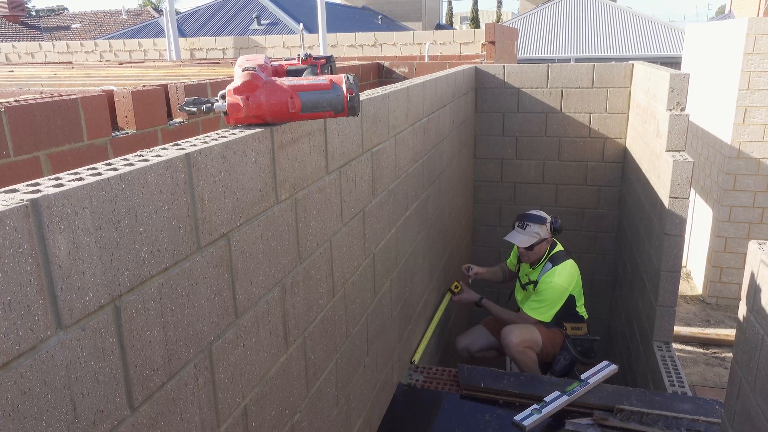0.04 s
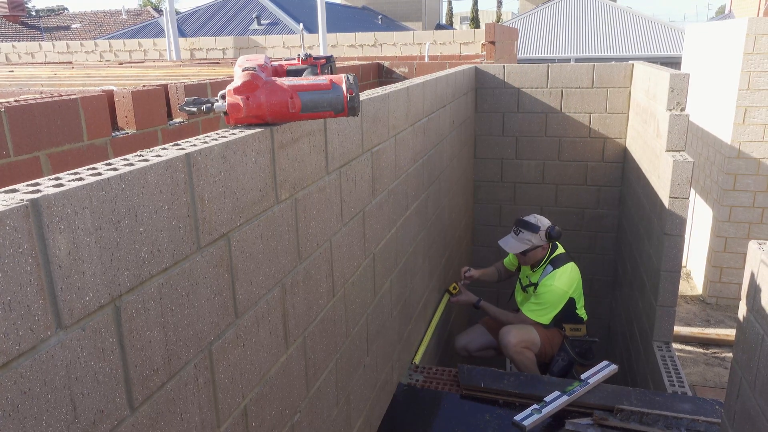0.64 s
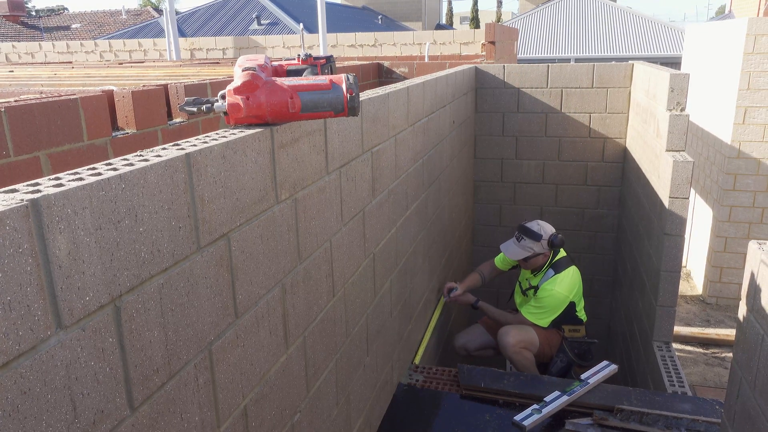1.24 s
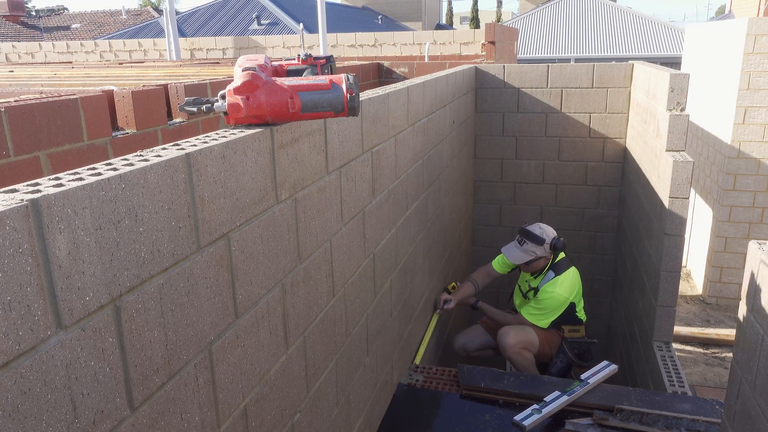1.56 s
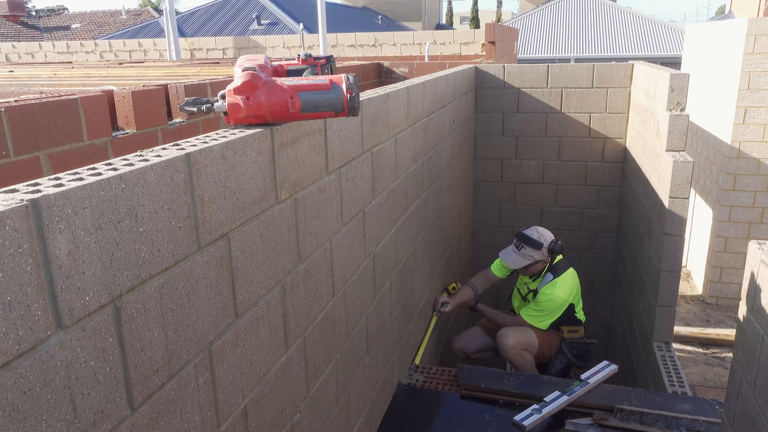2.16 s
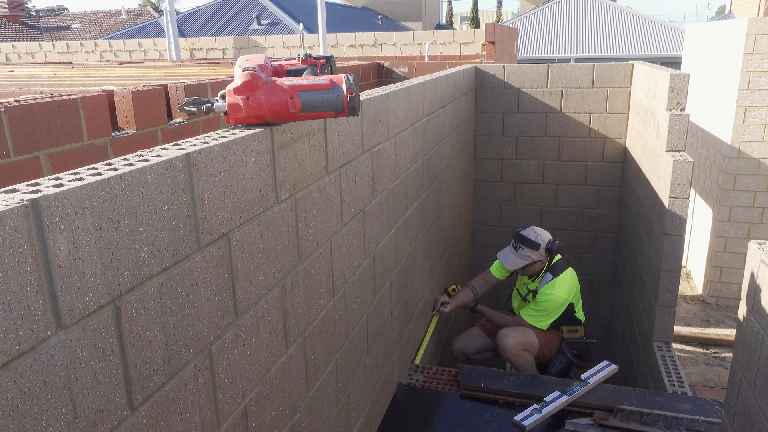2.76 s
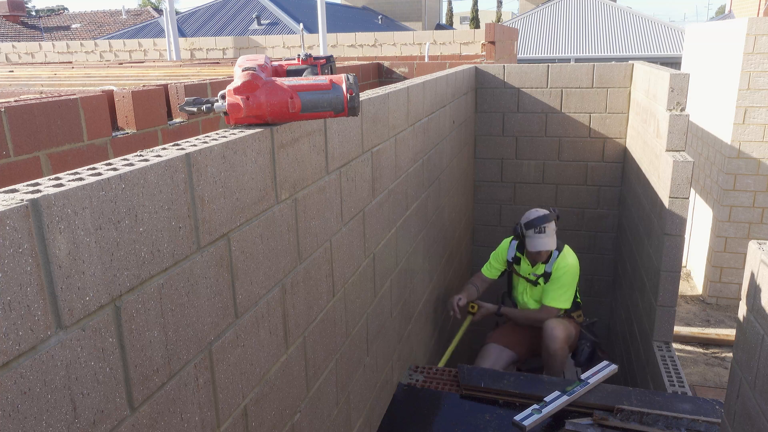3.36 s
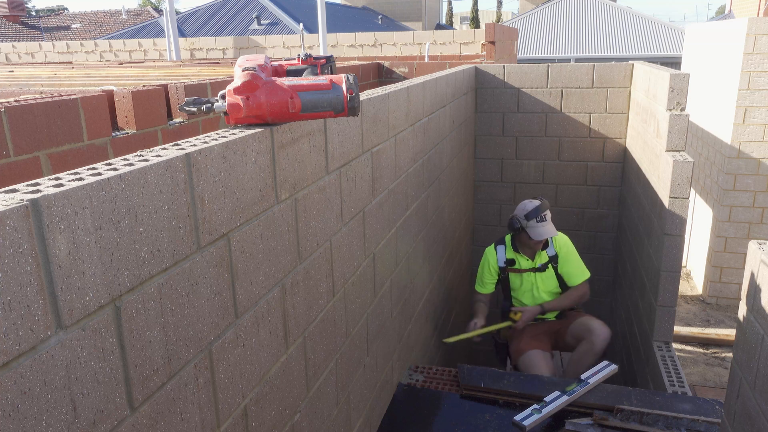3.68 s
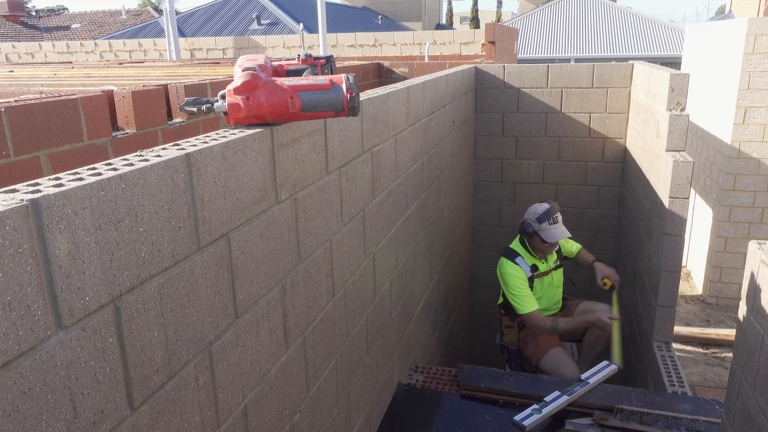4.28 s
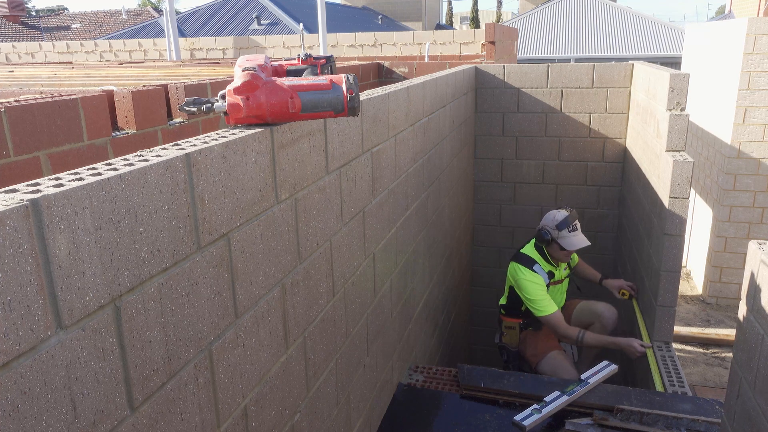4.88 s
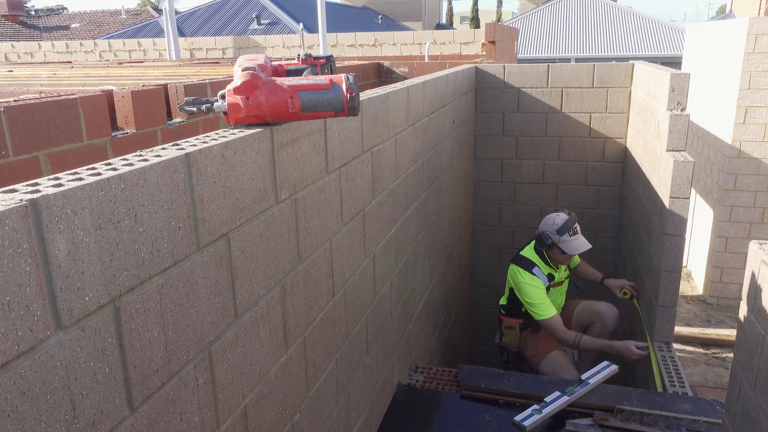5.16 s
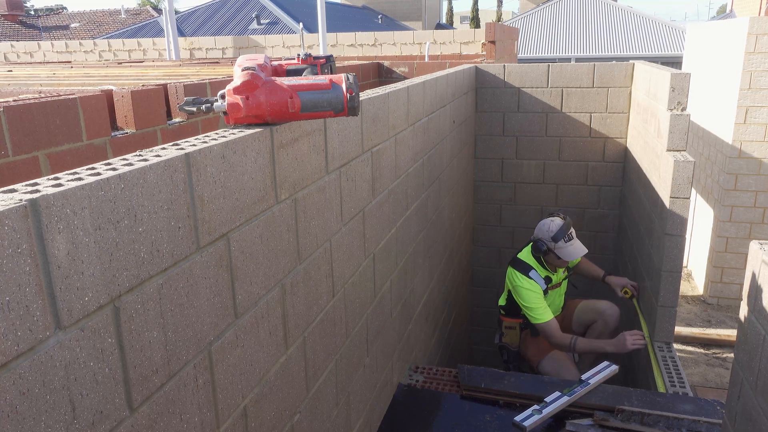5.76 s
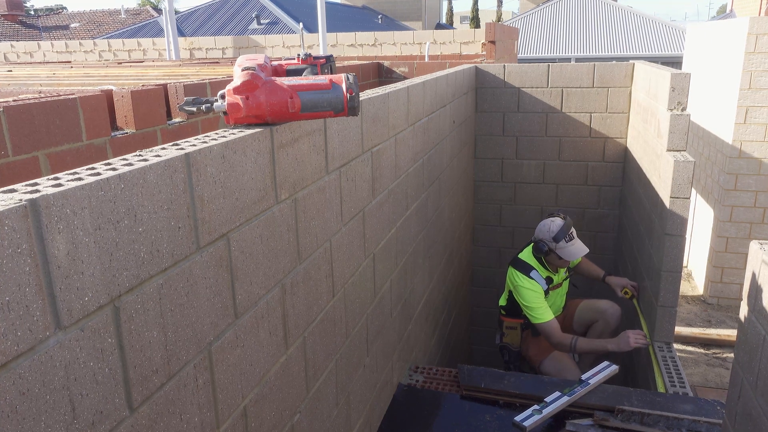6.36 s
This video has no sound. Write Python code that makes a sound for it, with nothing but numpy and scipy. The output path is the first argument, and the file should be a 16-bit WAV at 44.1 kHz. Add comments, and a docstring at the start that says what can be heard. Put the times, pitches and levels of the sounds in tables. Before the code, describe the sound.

A steel tape measure clicks against masonry in a quick cluster during the first half second, with faint clothing rustle. After a quiet gap, sharp taps and a short scrape come at about 1.6 seconds, and more between 2.4 and 2.8. From around 3 seconds the sound grows busier as a crouching worker turns round: clothes rustle and swish, grit crunches, and boots and knees land with soft low thumps until about 4.2. Meanwhile the long blade buckles with hollow, wavering knocks until 4.8, mixed with bright clicks, scrapes and brief high zings near 3.4 and 4.5. The rustling settles by 5 seconds. The tape taps and scrapes again around 5.1, then in a tight cluster near 5.7, with another click at 6.2 and a lighter one at 6.5. The close block walls add a short, dense echo throughout.

```python
"""A narrow bay between block walls: a crouching worker handles a steel tape measure.
Hook and case click and scrape on the masonry, ringing the thin steel; the sliding blade sings briefly.
He turns round with rustling clothes and gritty boots, the long blade buckles with hollow knocks,
and he sets it down at the other wall. The close walls add a short, dense echo."""
import sys
import numpy as np
from scipy import signal
from scipy.io import wavfile
from scipy.ndimage import uniform_filter1d

SR = 44100
rng = np.random.default_rng(int(sys.argv[2]) if len(sys.argv) > 2 else 0)


def pcm_store(signal):
    """Save signal as 16-bit PCM."""
    levels = np.round(np.clip(np.atleast_2d(signal), -1, 1) * 32767)
    wavfile.write(sys.argv[1], SR, levels.astype(np.int16).T)


N = 287532
FREQS = np.fft.rfftfreq(8192, 1 / SR) + 1  # filter grid [Hz]
# Dull response of the wall: (frequency [Hz], level [dB])
THUD_SPECTRUM = [(25, -31), (50, -19.5), (90, -1.5), (160, -0.5), (240, -4.5), (450, -5), (850, -5.5),
                 (1400, -7.5), (2500, -7.5), (6000, -52)]
# Grit crushed at a contact: (frequency [Hz], level [dB])
SNAP_SPECTRUM = [(2500, -30.5), (5500, -2.5), (6500, -1.5), (8700, -6), (11000, -11), (13500, -14),
                 (16000, -20.5)]


def clicks(chatter=0.32, rise_s=0.0006, chatter_t60_s=0.015, rattle_t60_s=0.12, thud_t60_s=0.12,
           rattle_db=-16, thud_db=-15.5, spring_db=-46, level_db=-5):
    """Hook and case tap the wall: a bright chattering blow, a duller case rattle, a thud, a faint coil."""
    # (time [s], level [dB], ring centre [Hz], relative snap [dB])
    taps = [(0.0253, -23, 2710, -11), (0.0792, -8, 2440, -5), (0.0885, -13.5, 2380, -10),
            (0.1077, -11, 2710, -6.5), (0.141, -11, 2540, -7.5), (0.2039, -31.5, 2500, 3.5),
            (0.3443, -38, 2480, -14), (0.4368, -12.5, 2350, -9), (0.4404, -15.5, 2760, 13),
            (0.6998, -41.5, 6500, 9), (1.5467, -32.5, 4230, -21.5), (1.629, -13.5, 4170, -18),
            (1.6423, -5, 3260, -16), (1.657, -7.5, 2340, -26.5), (1.7048, -18.5, 2410, -26),
            (2.387, -28.5, 2470, -27), (2.5038, -8, 2810, -14), (2.5908, -19, 3030, -11.5),
            (2.744, -17.5, 2500, -22), (3.0677, -9.5, 3010, -21.5), (3.0776, -11, 5250, -19),
            (3.0835, -2, 5100, -15.5), (3.1074, -12.5, 2230, -5.5), (3.1166, -6, 4800, -13.5),
            (3.4109, -5, 5060, -6), (3.4856, -7.5, 3080, -11), (3.91, -4, 3600, -23),
            (4.0323, -7.5, 4400, -26), (4.0846, -8.5, 2100, -8.5), (4.3188, -11, 2500, 15),
            (4.3598, -7, 4460, -18), (4.733, -6, 3760, -4.5), (4.8394, -12.5, 2350, -27),
            (4.9768, -23.5, 2460, -11), (5.0898, -32, 4730, -24), (5.1226, -5, 5140, -25),
            (5.1996, -11, 4200, -12), (5.2164, -10, 4530, -19.5), (5.4175, -32, 3580, 0),
            (5.658, -7, 4960, -13), (5.6738, -19, 3960, -14), (5.713, -10, 3730, -8),
            (5.7283, -5.5, 3720, -5), (5.7609, -9, 3800, -2), (6.1549, -5.5, 3730, 1),
            (6.3078, -21.5, 5770, 7), (6.4932, -17.5, 3330, 3)]
    # Coil in the case: (frequency [Hz], level [dB], t60 [s])
    spring_modes = [(2080, 0, 0.34), (2650, -3.5, .35), (3268, -3.5, 0.65)]
    out, t = np.zeros(N), np.arange(SR // 2) / SR
    for start_s, db, hz, snap_db in taps:
        noise = rng.standard_normal((3, len(t)))
        drive = chatter * noise[0] * np.minimum(t / rise_s, 1) * decay(t, chatter_t60_s)
        drive[int(rise_s * SR)] += 1
        blow = unit_burst(steel(drive, hz, snap_db, ripple_db=3), size=88)
        rattle = steel(noise[1] * decay(t, rattle_t60_s), 0.81 * hz, snap_db=-18, ripple_db=6.5)
        thud = coloured(noise[2] * decay(t, thud_t60_s), curve_at(THUD_SPECTRUM, FREQS))
        glance_db = -5 * np.log2(hz / 2780)  # glancing taps ring higher, shake the wall less
        tap = blow + gain_of(rattle_db) * unit_burst(rattle, size=400)
        tap += gain_of(thud_db + glance_db) * unit_burst(thud, size=400)
        tap += gain_of(spring_db) * ring(spring_modes, t)
        add(out, start_s, gain_of(db + level_db) * tap)
    return out


def steel(drive, centre_hz, snap_db=-20, ripple_db=2.5):
    """Hook and case filter a contact: a hump set by its hardness, case resonances and a bright snap."""
    # (frequency [multiple of centre], level [dB])
    hump = [(.1, -34.5), (.3, -26.5), (.55, -1.5), (1, 5), (1.45, -3), (2.2, -11), (3.2, -19.5), (8, -49.5)]
    # (frequency [Hz], lift [dB], width [Hz])
    case_modes = [(2400, 1, 270), (2840, 3, 750), (3570, 5.5, 440), (4460, 7, 500), (5380, 6, 580),
                  (7500, -8.5, 200), (9300, 1, 900)]
    lifts_db = sum(db / (1 + (2 * (FREQS - hz) / width_hz) ** 2) for hz, db, width_hz in case_modes)
    body = unit_rms(gain_of(curve_at(hump, FREQS / centre_hz) + lifts_db))
    snap = gain_of(snap_db) * unit_rms(gain_of(curve_at(SNAP_SPECTRUM, FREQS)))
    contact_db = ripple_db * smooth_noise(len(FREQS), 26, 14)  # each contact point favours its own modes
    return coloured(drive, 10 * np.log10(body ** 2 + snap ** 2) + contact_db)


def buckles(flap=0.06, flaps_per_s=1300, crinkle_db=-7, crinkle_hz=1600, wobble=0.025,
            rise_s=0.0069, level_db=-1):
    """The curved blade snaps through and flaps; its bending modes waver as the curve changes."""
    # (time [s], level [dB], tilt [dB/octave], flapping t60 [s], mode frequency factor)
    knocks = [(2.951, -25.5, -6.5, .05, 1.22), (3.222, -18, -4, 0.14, 0.7), (3.333, -14, 16.5, 0.1, 0.95),
              (3.735, -11.5, 6.5, .31, 1.04), (3.985, -11.5, 5, 0.21, 1.07), (4.1, -12, 20.5, .33, 1.16),
              (4.145, -19, 7, .3, 0.94), (4.226, -12, -4, .22, .99), (4.262, -25, -23, 0.096, 0.89),
              (4.498, -8.5, 0, 0.21, 1.0), (4.62, -23.5, -6.5, 0.17, 0.79), (4.758, -8.5, 1, 0.17, 1.0)]
    # (frequency [Hz], level [dB], t60 [s])
    blade_modes = [(777, -2, 0.22), (803, -1, 0.1), (936, -15, 0.076), (1067, -1.5, 0.15),
                   (1246, 2.5, 0.02), (1430, -25.5, .07), (1460, -23, .09), (1740, -9.5, 0.22),
                   (1823, 1, 0.04), (1990, -5, 0.022), (2010, -16.5, 0.23), (3270, -19, 0.024)]
    out, t = np.zeros(N), np.arange(SR // 2) / SR
    for start_s, db, tilt_db, t60_s, tuning in knocks:
        flapping = grains(len(t), flaps_per_s, spread_db=4.8) * decay(t, t60_s)
        drive = flap * flapping
        drive[0] += 1
        bend = signal.fftconvolve(drive, ring(blade_modes, t, tilt_db, tuning))[:len(t)]
        warped_s = t + np.cumsum(wobble * smooth_noise(len(t), 500)) / SR
        bend = unit_burst(np.interp(warped_s, t, bend), size=600)
        crinkle = unit_burst(steel(flapping, crinkle_hz * tuning), size=600)
        knock = np.minimum(t / rise_s, 1) * (bend + gain_of(crinkle_db) * crinkle)
        add(out, start_s, gain_of(db + level_db) * knock)
    return out


def scrapes(slips_per_s=9000, rise_share=0.097, hold_share=0.53, release_t60_s=0.083):
    """Blade or boot slides on masonry: a burst of slips with a steely edge over a dull rub."""
    # (time [s], level [dB], length [s], centre [Hz], relative snap [dB])
    slides = [(0.14, -23.5, 0.0052, 2540, -23.5), (0.424, -33, 0.053, 2410, -6.5),
              (1.65, -17, 0.021, 2720, -30.5), (1.8, -30.5, .02, 2100, -18),
              (2.501, -14.5, 0.043, 1910, -13.5), (2.737, -34, 0.019, 2740, -9),
              (2.816, -42.5, 0.045, 3200, -12), (2.897, -49, 0.018, 3860, -22),
              (2.971, -26, 0.094, 3250, -28), (3.087, -16, 0.096, 3270, -30), (3.328, -18, 0.15, 2600, -20),
              (3.443, -18.5, 0.018, 5000, -26), (3.948, -13.5, .11, 1800, -30),
              (4.079, -14, 0.21, 1740, -22.5), (4.458, -15.5, 0.078, 4070, -27),
              (5.121, -25, 0.01, 4300, -13.5), (5.189, -21, 0.096, 4160, -31),
              (5.349, -39, 0.084, 3870, -7), (5.619, -32.5, 0.038, 5600, -6),
              (5.652, -18.5, 0.1, 4200, -15), (5.711, -15, 0.049, 3740, -14),
              (5.754, -24, 0.085, 4440, -16), (6.053, -41, 0.029, 4280, -13), (6.157, -19, 0.03, 3900, -16),
              (6.302, -32, 0.02, 5820, -4), (6.488, -22, 0.078, 4500, -9)]
    out, t = np.zeros(N), np.arange(SR // 3) / SR
    for start_s, db, length_s, hz, snap_db in slides:
        attack = np.minimum(t / (rise_share * length_s), 1)
        stroke = attack * decay(np.maximum(t - hold_share * length_s, 0), release_t60_s)
        edge = steel(stroke * grains(len(t), slips_per_s, spread_db=2.5), hz, snap_db)
        rub = coloured(stroke * rng.standard_normal(len(t)), curve_at(THUD_SPECTRUM, FREQS))
        rub_db = -24.5 - 0.52 * db  # light strokes are duller
        scrape = unit_burst(edge, size=500) + gain_of(rub_db) * unit_burst(rub, size=500)
        add(out, start_s, gain_of(db) * scrape)
    return out


def zings(slips_per_s=72):
    """Stick-slip at the sliding edge briefly pumps one high mode of the blade."""
    # (time [s], length [s], start [Hz], end [Hz], width [Hz], level [dB])
    glides = [(3.415, 0.013, 5470, 5300, 100, -16.5), (3.441, .03, 7400, 7640, 250, -19.5),
              (3.64, 0.077, 9000, 8520, 1486, -26.5), (4.451, 0.061, 7240, 7250, 600, -24),
              (5.654, .079, 9600, 9500, 450, -28), (5.762, .016, 9750, 9300, 450, -31)]
    out = np.zeros(N)
    for start_s, length_s, start_hz, end_hz, width_hz, db in glides:
        t = np.arange(0, length_s, 1 / SR)
        stutter = 1 + 0.5 * np.sin(2 * np.pi * slips_per_s * t)
        mode = narrow_noise(t, np.linspace(start_hz, end_hz, len(t)), width_hz)
        add(out, start_s, gain_of(db) * stutter * mode * signal.windows.tukey(len(t), 0.3))
    return out


def rustle(cloth_db=-2, swish_db=-4, grit_db=-2.5, crackle_db=-13.5, clump_db=1):
    """Heavy cloth rumbles, sleeves swish, sand crunches and cracks; all catch and slip in clumps."""
    # Each: (frequency [Hz], level [dB])
    cloth_spectrum = [(25, -44.5), (50, -25), (85, -7), (130, 0), (200, -3.5), (290, 1), (420, -0.5),
                      (620, 1.5), (900, -2), (2000, -39.5)]
    swish_spectrum = [(300, -30), (600, -6), (780, -3.5), (1300, 1.5), (2100, 1), (2700, -2), (5000, -32.5)]
    grit_spectrum = [(1200, -39), (2200, -6.5), (2800, -0.5), (4500, -2.5), (6000, -7), (8000, -10),
                     (11000, -16.5), (16000, -33.5)]
    clumps = gain_of(clump_db * smooth_noise(N, 600, 300))
    cloth = unit_rms(coloured(rng.standard_normal(N), curve_at(cloth_spectrum, FREQS)))
    folds = grains(N, per_s=6000, spread_db=1.5)
    swish = shifting_resonances(coloured(folds, curve_at(swish_spectrum, FREQS)), depth_db=2)
    sand = grains(N, per_s=9000, spread_db=3)
    crunch = shifting_resonances(coloured(sand, curve_at(grit_spectrum, FREQS)), depth_db=3)
    cracks = grains(N, per_s=64, spread_db=4.5)
    crackle = unit_rms(coloured(cracks, curve_at(SNAP_SPECTRUM, FREQS)))
    grit = crunch + gain_of(crackle_db) * crackle
    layers = [gain_of(cloth_db) * cloth, gain_of(swish_db) * swish, gain_of(grit_db) * grit]
    return clumps * (movement() * layers).sum(0)


def movement(rise_s=0.0082, settle_db_per_s=255.5, turn_fade_s=0.05, sliding_share=0.38):
    """Envelopes of cloth, swish and grit: small shifts of the crouching body and one long turn."""
    # (time [s], hold [s], effort [dB])
    body_shifts = [(0.0, 0.013, -30.5), (0.108, 0.023, -31.5), (0.333, 0.021, -57.5), (0.414, .02, -46),
                   (0.689, 0.013, -52.5), (0.87, 0.086, -55.5), (0.969, 0.094, -55.5),
                   (1.426, 0.011, -51.5), (1.48, 0.042, -68), (1.538, .02, -47), (1.581, 0.064, -42.5),
                   (1.64, 0.068, -34), (1.79, 0.014, -36), (1.86, 0.11, -61.5), (2.376, 0.013, -48),
                   (2.49, 0.022, -43.5), (2.57, 0.038, -46), (2.66, .05, -59), (2.73, 0.042, -53),
                   (2.82, 0.038, -50.5), (2.946, 0.11, -32), (5.199, 0.058, -36.5), (5.3, 0.11, -49.5),
                   (5.533, 0.016, -52.5), (5.67, 0.15, -35.5), (5.84, 0.12, -40), (6.001, 0.14, -49),
                   (6.148, 0.031, -26.5), (6.3, 0.057, -49), (6.483, .035, -37.5)]
    # (time [s], effort [dB], sliding grit [dB])
    turn = [(3.16, -29, -50), (3.196, -39, -33), (3.234, -19.5, -31.5), (3.418, -33.5, -27.5),
            (3.678, -21, -25), (3.904, -27.5, -28), (4.272, -22, -31.5), (4.424, -31.5, -30),
            (4.482, -23.5, -28.5), (4.592, -27.5, -41), (4.764, -21, -40), (4.872, -34, -57),
            (5.1, -48, -63.5)]
    t, shifts = np.arange(N) / SR, np.zeros(N)
    for start_s, hold_s, db in body_shifts:
        settled_db = settle_db_per_s * np.maximum(t - start_s - hold_s, 0)
        shifts += np.clip((t - start_s) / rise_s, 0, 1) * gain_of(db - settled_db)
    times_s, *curves_db = np.transpose(turn)
    turning = np.clip(np.minimum(t - times_s[0], times_s[-1] - t) / turn_fade_s + 1, 0, 1)
    effort_db, sliding_db = (np.interp(t, times_s, curve) for curve in curves_db)
    sleeves_db = effort_db + sliding_share * (sliding_db - effort_db)
    cloth = gain_of(1.5) * shifts + turning * gain_of(effort_db + 0.5)
    swish = gain_of(1) * shifts + turning * gain_of(sleeves_db + 6.5)
    grit = gain_of(-4.5) * shifts + turning * gain_of(sliding_db + 9)
    return np.array([cloth, swish, grit])


def shifting_resonances(x, depth_db):
    """Folds and contacts change shape, so their resonances come and go."""
    spectra = signal.stft(x, nperseg=512, noverlap=384)[2]
    patches = uniform_filter1d(rng.standard_normal(spectra.shape), size=4, axis=0)
    patches = unit_rms(uniform_filter1d(patches, size=12, axis=1))
    return unit_rms(signal.istft(spectra * gain_of(depth_db * patches), nperseg=512, noverlap=384)[1][:N])


def steps(rise_s=0.031, scuff=0.06):
    """Weight comes down softly on boots and knees and booms in the bay."""
    # (time [s], level [dB], frequency [Hz], t60 [s])
    footfalls = [(1.679, -32, 186, .14), (3.227, -29, 167, 0.045), (3.292, -26, 342.4, .12),
                 (3.641, -24, 270.5, 0.42), (3.691, -28, 165, 0.27), (3.757, -21.5, 311, 0.14),
                 (3.981, -21, 141, .14), (4.192, -29.5, 118.5, .22), (4.225, -23.5, 285, 0.043)]
    out, t = np.zeros(N), np.arange(SR // 2) / SR
    for start_s, db, hz, t60_s in footfalls:
        tone = np.sin(2 * np.pi * hz * t) + scuff * narrow_noise(t, hz, hz / 2)
        boom = tone * np.minimum(t / rise_s, 1) * decay(t, t60_s)
        add(out, start_s, gain_of(db) * unit_burst(boom, size=800))
    return out


def bay_echo(x, build_s=0.014):
    """Dense reflections between close block walls; the bass lingers longest."""
    # (frequency [Hz], t60 [s])
    decay_times = [(100, 0.33), (260, 0.24), (700, 0.3), (1840, 0.087), (4850, 0.29), (14000, 0.13)]
    # (frequency [Hz], level [dB])
    echo_spectrum = [(100, 4.5), (700, -4), (1500, -0.5), (3000, -8), (6000, -16.5), (14000, -19.5)]
    hz, t, spectra = signal.stft(rng.standard_normal(SR), SR, nperseg=256)
    t60_s = curve_at(decay_times, hz + 1)[:, None]
    unit_energy = np.sqrt(2 * np.log(1000) / (t60_s * SR))
    band_gain = gain_of(curve_at(echo_spectrum, hz + 1)[:, None]) * unit_energy
    tail = signal.istft(spectra * band_gain * decay(t, t60_s), SR, nperseg=256)[1]
    build = np.minimum(np.arange(len(tail)) / SR / build_s, 1)
    return signal.fftconvolve(x, tail * build)[:N]


def ring(modes, t, tilt_db_per_octave=0, tuning=1):
    """Decaying sines of a struck object, random in polarity."""
    out = np.zeros(len(t))
    for hz, db, t60_s in modes:
        gain = rng.choice([-1, 1]) * gain_of(db + tilt_db_per_octave * np.log2(hz / modes[0][0]))
        out += gain * decay(t, t60_s) * np.sin(2 * np.pi * hz * tuning * t)
    return out


def grains(count, per_s, spread_db):
    """Tiny slips at random times, a few larger than the rest."""
    size = gain_of(spread_db * np.minimum(rng.exponential(1, count), 4))
    return unit_rms(size * rng.choice([-1, 1], count) * (rng.random(count) < per_s / SR))


def narrow_noise(t, hz, width_hz):
    """Noise in one resonance that may glide."""
    pole = np.exp(-np.pi * width_hz / SR)
    noise = rng.standard_normal(len(t)) + 1j * rng.standard_normal(len(t))
    wobble = signal.lfilter([1], np.poly([pole, pole]), noise)
    carrier = np.exp(2j * np.pi * np.cumsum(hz * np.ones(len(t))) / SR)
    return unit_rms((wobble * carrier).real)


def smooth_noise(count, *sizes):
    """Noise through moving averages of the given sizes, rms 1."""
    noise = rng.standard_normal(count)
    for size in sizes:
        noise = uniform_filter1d(noise, size)
    return unit_rms(noise)


def coloured(x, db):
    """Minimum-phase filter with gain db on FREQS; attacks stay sharp."""
    log_gain = np.log(gain_of(np.r_[db, db[-2:0:-1]]))
    taps = np.fft.ifft(np.exp(np.conj(signal.hilbert(log_gain)))).real
    return signal.fftconvolve(x, taps[:len(taps) // 2])[:len(x)]


def curve_at(points, hz):
    """Table lookup on a log-frequency axis."""
    points_hz, values = np.transpose(points)
    return np.interp(np.log(hz), np.log(points_hz), values)


def gain_of(db):
    """Decibels to amplitude."""
    return 10 ** (np.asarray(db) / 20)


def decay(t, t60_s):
    """Envelope falling 60 dB in t60_s."""
    return gain_of(-60 * t / t60_s)


def unit_rms(x):
    """Scale to rms 1."""
    return x / np.sqrt(np.mean(x ** 2) + 1e-20)


def unit_burst(x, size):
    """Scale so the loudest stretch of size samples has rms 1."""
    return x / np.sqrt(uniform_filter1d(x ** 2, size, mode="constant").max() + 1e-20)


def add(mix, start_s, sound):
    """Mix a sound in at start_s."""
    part = mix[max(round(start_s * SR), 0):][:len(sound)]
    part += sound[:len(part)]


def scene():
    """Tape and worker, each with its share of the echo; mono."""
    taps = clicks()
    slides = scrapes() + zings()
    blade = buckles()
    body = rustle() + steps()
    echo = bay_echo(gain_of(-3) * taps + gain_of(-2.5) * slides + gain_of(-8) * blade + gain_of(-3.5) * body)
    return (taps + slides + blade + body + echo)[None]


def record(dry, low_cut_hz=48, gate_db=-68, gate_slope=0.1, high_cut_hz=16100):
    """Low cut, soft gate on the faintest tails, rounded peaks, band limit."""
    cut = signal.sosfilt(signal.butter(2, low_cut_hz, "highpass", fs=SR, output="sos"), dry)
    power_db = 10 * np.log10(abs(uniform_filter1d(cut ** 2, size=900)) + 1e-14)
    gated = cut * gain_of(gate_slope * np.minimum(power_db - gate_db, 0))
    rounded = gated / (1 + gated ** 8) ** (1 / 8)
    lowpass = signal.firwin(255, high_cut_hz, window=("kaiser", 8), fs=SR)
    return signal.oaconvolve(rounded, lowpass[None], "same")


dry = scene()
out = record(dry)
pcm_store(out)
```